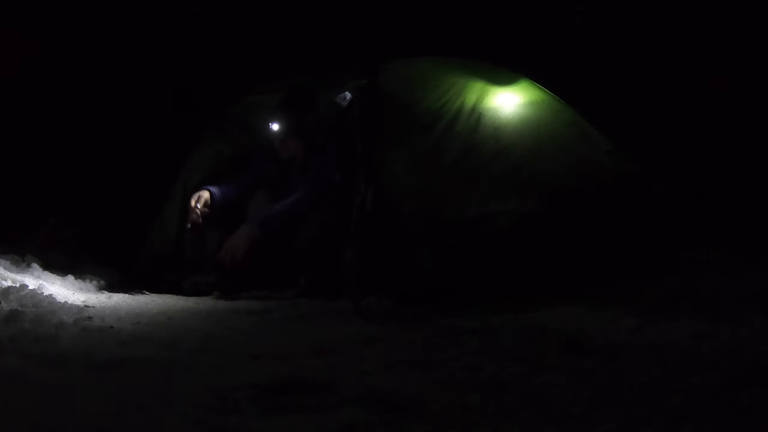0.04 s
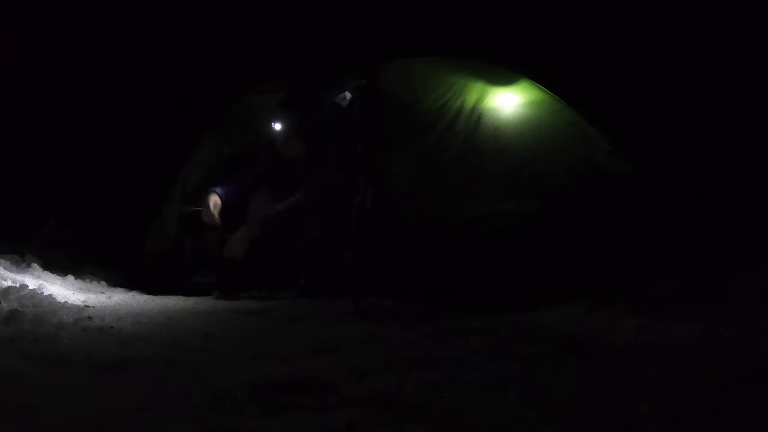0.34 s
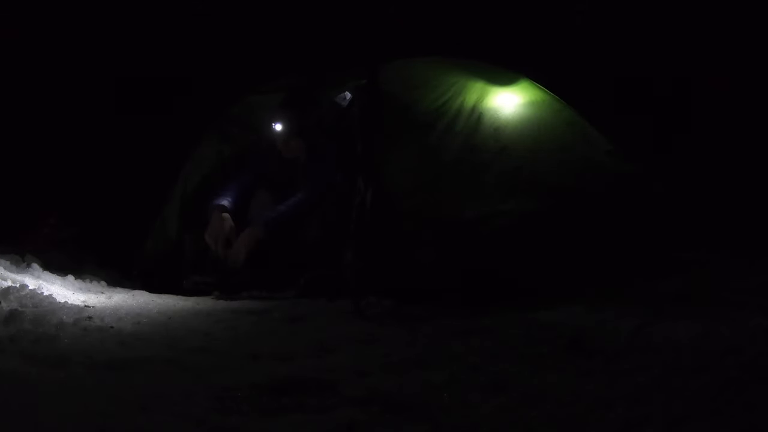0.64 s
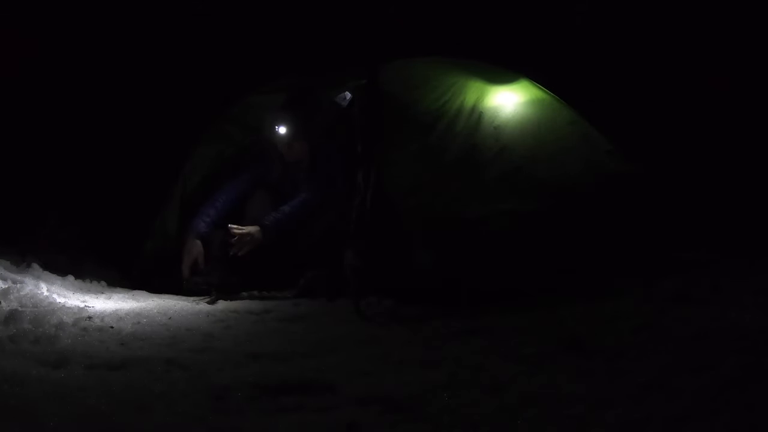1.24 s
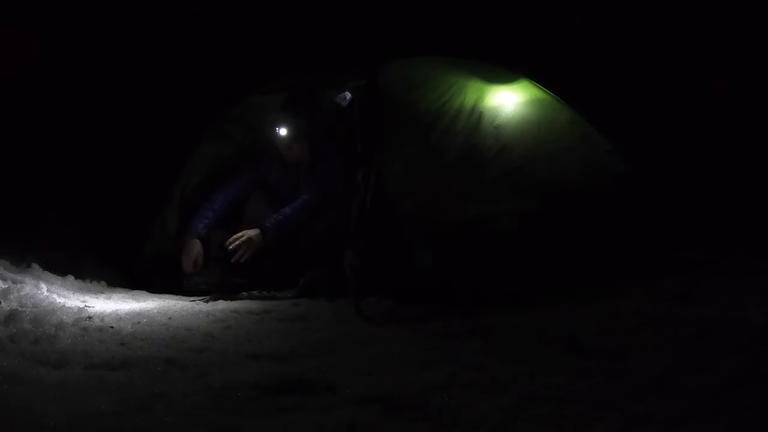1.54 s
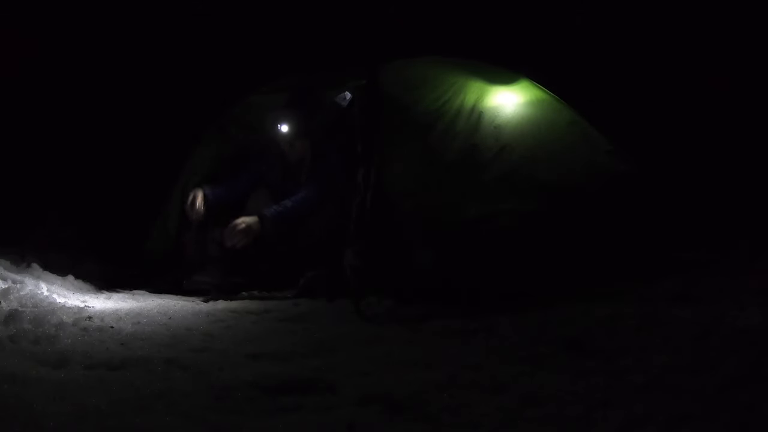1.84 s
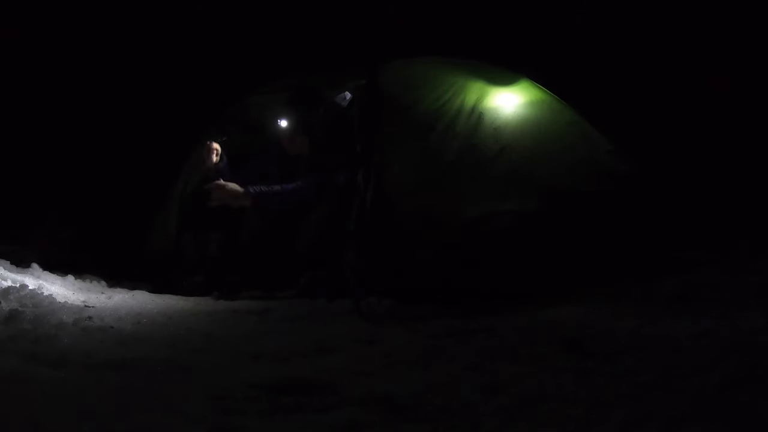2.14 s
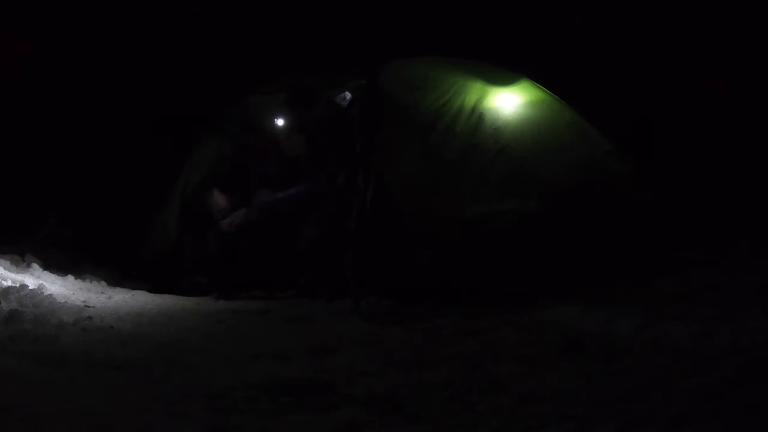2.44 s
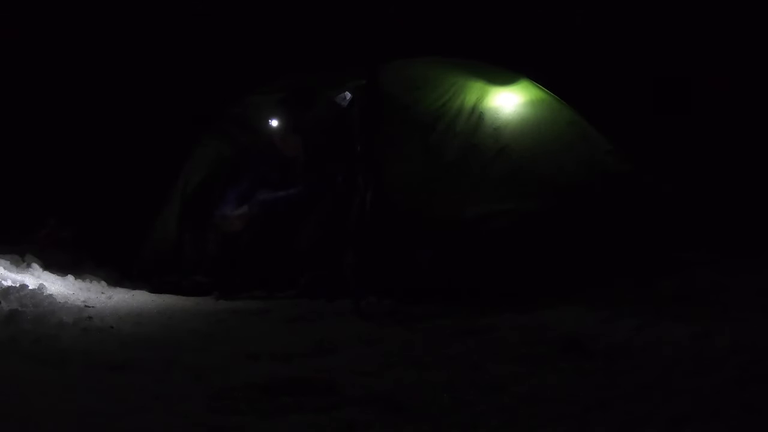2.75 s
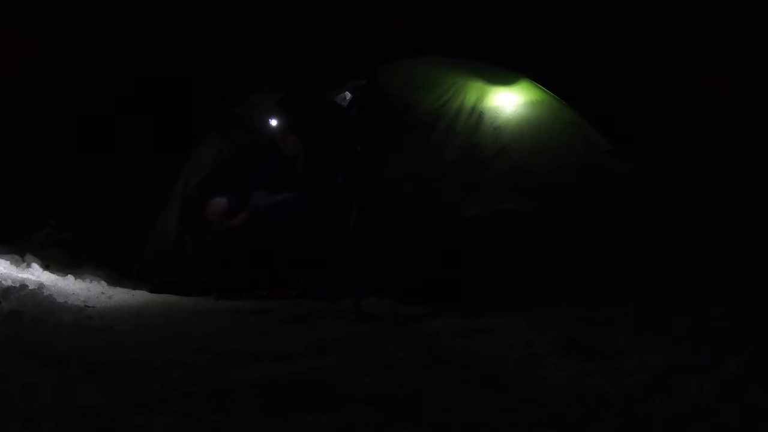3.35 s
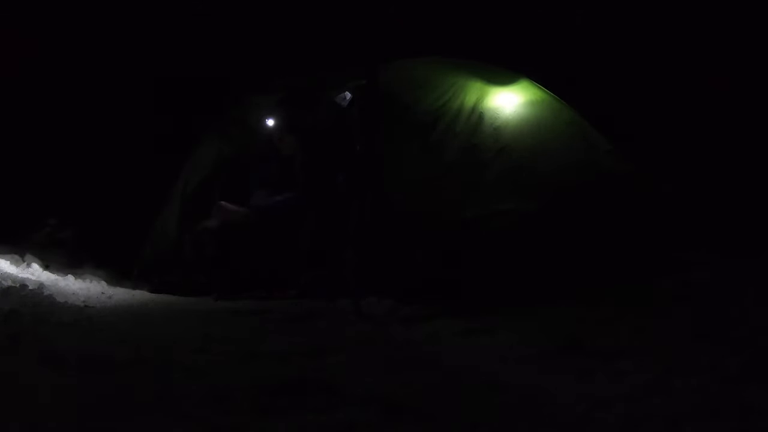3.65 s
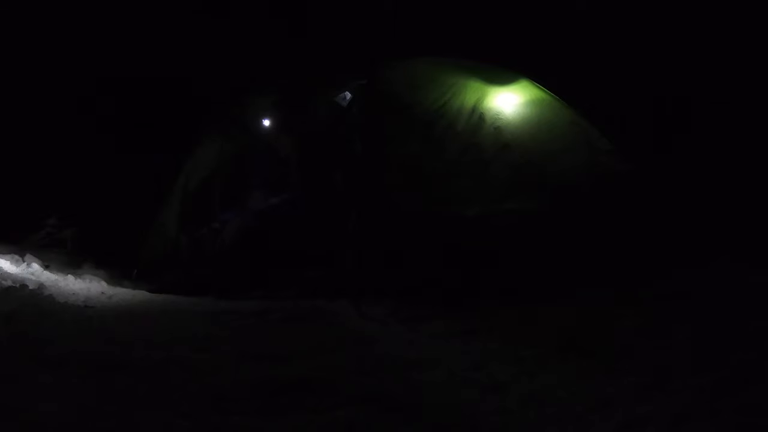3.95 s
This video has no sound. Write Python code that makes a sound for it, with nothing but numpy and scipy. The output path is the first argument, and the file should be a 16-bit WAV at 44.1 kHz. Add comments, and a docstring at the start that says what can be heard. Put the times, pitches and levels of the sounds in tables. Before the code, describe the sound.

Wind buffets the microphone with a low, fluttering drone, strongest in the first 1.3 seconds, while blown snow hisses faintly over a tent. Someone shifts close by, with light nylon ticks and a soft snow crunch near 0.7 seconds. A cluster of dull thumps in the snow comes around 1.4 seconds. The wind then eases; from about 3 seconds nylon swishes, and snow crunches again near 3.5 and 3.9 seconds.

```python
"""A tent on a snowfield at night, heard in stereo from its doorway. From the start, wind buffets the
microphone, whose housing drones near 200 Hz, and drives fine snow hissing over the fabric. Close by,
someone shifts about: nylon ticks and packed snow crunches. Dull thumps come from snow giving way, hardest
around 1.4 s, and twice from wind pushing on the microphone. The wind then eases; from about 3 s the
nylon swishes louder and the snow crunches again."""
import sys
import numpy as np
from scipy import signal
from scipy.io import wavfile

SR = 44100
rng = np.random.default_rng(int(sys.argv[2]) if len(sys.argv) > 2 else 0)


def store_pcm(level_fs):
    """Save levels as 16-bit WAV."""
    pcm = np.round(np.clip(level_fs, -1, 1) * 32767).astype(np.int16)
    wavfile.write(sys.argv[1], SR, np.atleast_2d(pcm).T)


N = 176400

# Wind at the microphone. Each row: time in seconds, level of the drone in dB.
WIND_LEVEL = [(0, -50), (.42, -55.5), (.52, -53), (.9, -53), (1.2, -47), (1.45, -59), (1.82, -60.5),
              (2.1, -57.5), (2.4, -61), (3.05, -63), (3.3, -56), (3.6, -62.5), (3.82, -60), (4, -56.5)]
# Single buffets, then deep puffs. Each row: centre in seconds, level in dB, half length in seconds.
WIND_BUFFETS = [(.012, -32, 0.018), (.064, -32.5, 0.011), (.118, -40, 0.0095), (.16, -41, 0.013),
                (.25, -43.5, 0.044), (.295, -39.5, 0.012), (.335, -37, 0.0058), (.408, -38, 0.0058),
                (.437, -43, 0.028), (.66, -36.5, 0.01), (.745, -47.5, 0.0069), (.83, -44.5, 0.013),
                (.95, -44.5, 0.014), (1.045, -48.5, 0.044), (1.079, -36.5, 0.02), (1.118, -35.5, 0.0052),
                (1.253, -40.5, 0.015), (1.535, -45, 0.012), (1.668, -50, 0.021), (3.497, -43.5, 0.0049),
                (3.71, -55, 0.014), (3.892, -41, 0.0082), (3.98, -53, 0.03)]
WIND_PUFFS = [(.02, -49.5, 0.046), (.188, -45, 0.031), (1.235, -44.5, 0.021), (1.62, -63, 0.12),
              (3.755, -56, 0.013)]
# Close rumble, puffs and far wind. Each row: frequency in Hz, relative level in dB.
RUMBLE_COLOUR = [(122, -19), (142, -13), (170, 17.5), (230, 1.5), (310, -4), (420, -18), (800, -33),
                 (1100, -36)]
DEEP_PUFF_COLOUR = [(30, -21), (70, -8), (110, -3), (155, 9.5), (270, 14.5), (400, -29.5)]
FAR_WIND_COLOUR = [(22, -14), (45, 12), (90, -13.5), (200, 3), (330, 7), (550, 5.5), (760, 6.5),
                   (1040, -17), (1400, 8), (1900, -41.5), (3000, -40)]
# How alike left and right are. Each row: frequency in Hz, coherence (limited to -1..1 in use).
STEREO_LIKENESS = [(30, 0.46), (150, 0.77), (390, 0.35), (620, -1.04), (980, -0.36), (1560, -0.22),
                   (2500, 0.62), (4000, 1), (6300, 0.58), (9000, 0.4), (14000, -0.32)]
# Blown snow, high sizzle and lower hiss. Each row: time in seconds, relative level in dB.
SIZZLE_LEVEL = [(0, -82), (0.17, -82), (0.24, -72), (0.27, -79.5), (0.8, -71), (1.05, -70.5), (1.15, -80),
                (1.21, -74), (1.64, -75), (1.94, -76), (1.97, -69.5), (2.02, -75.5), (2.38, -74.5),
                (2.46, -67), (2.81, -75), (2.95, -72.5), (3.02, -68), (3.21, -68.5), (3.8, -66.5),
                (3.87, -71.5), (4.0, -72.5)]
HISS_LEVEL = [(0, -72.5), (0.24, -74.5), (0.27, -77.5), (1.02, -68.5), (1.16, -72), (1.28, -70.5),
              (1.45, -75), (2.24, -67), (2.38, -76.5), (2.45, -69), (2.71, -72.5), (2.93, -69.5),
              (3.07, -64.5), (3.16, -66), (3.65, -71), (3.7, -68), (4.0, -66.5)]
# Their tone. Each row: frequency in Hz, relative level in dB.
SNOW_SIZZLE_COLOUR = [(4000, -5.5), (6500, -1), (8200, 1), (9500, -1.5), (10500, -10), (14500, -22.5)]
SNOW_HISS_COLOUR = [(1200, -2.5), (2200, -3.5), (3000, -1), (3900, -0.5), (4600, 3.5), (5800, -2.5),
                    (7500, -12), (11000, -12.5)]
# Snow crunching under shifting weight. Each row: time in seconds, level in dB.
CRUNCH_LEVEL = [(0, -60.5), (.69, -93), (.728, -53), (.748, -65), (.768, -53.5), (.805, -58), (.85, -69),
                (1.15, -69), (1.34, -68), (1.385, -57), (1.435, -58), (1.5, -72.5), (2.3, -84), (2.52, -63),
                (2.72, -67), (2.79, -56.5), (3.08, -58), (3.33, -69.5), (3.385, -52), (3.44, -70.5),
                (3.51, -52.5), (3.58, -72), (3.8, -65.5), (3.9, -52), (4, -53)]
# Its tone. Each row: frequency in Hz, relative level in dB.
SNOW_CRUNCH_COLOUR = [(170, 0), (300, 13), (500, 4), (700, -4), (850, -19.5), (1100, -27), (1500, -13)]
# Dull thumps: snow giving way, plus two low pushes of wind on the microphone (0.187 s and 1.23 s).
# Each row: time of the peak in seconds, relative level in dB, pitch there in Hz.
DULL_THUMPS = [(.057, -40, 383), (0.187, -36, 200), (0.733, -42, 390), (1.218, -45, 294), (1.23, -52, 170),
               (1.344, -40.5, 590), (1.353, -46.5, 300), (1.378, -39, 563), (1.387, -35.5, 425),
               (1.392, -42, 432), (1.408, -31, 400), (1.412, -44, 240), (1.423, -40, 485),
               (1.436, -27, 470), (1.439, -30, 257), (1.4508, -34, 482), (1.48, -45, 520),
               (2.331, -38.5, 298), (2.491, -49.5, 520), (2.747, -48, 560), (2.769, -48.5, 500),
               (2.83, -55, 570), (2.965, -44.5, 520), (3.491, -35.5, 357), (3.512, -42, 424),
               (3.866, -46, 470), (3.919, -37.5, 396), (3.931, -42, 480)]
# Creases flipping. Each row: start in seconds, relative level in dB, pitch in Hz.
NYLON_TICKS = [(0.057, -69, 2640), (0.096, -63, 5000), (.107, -66.5, 775), (.2, -63.5, 4500),
               (.239, -67, 8050), (.72, -61, 890), (0.727, -70, 1150), (0.762, -69, 1150),
               (0.791, -74, 1290), (.867, -61, 3200), (0.909, -60, 3270), (.915, -63, 3230),
               (1.012, -63, 3300), (1.029, -60, 3600), (1.116, -66, 1770), (1.217, -60.5, 3430),
               (1.253, -58.5, 3370), (1.271, -59, 3480), (1.291, -56, 3210), (1.5667, -61.5, 4300),
               (1.975, -62, 7000), (2.572, -67, 1510), (2.766, -63, 1390), (2.788, -59, 2010),
               (2.796, -61, 1650), (2.829, -64, 890), (3.073, -57.5, 980), (3.317, -61, 1870),
               (3.488, -59, 5000), (3.507, -59.5, 1290), (3.885, -57.5, 2200)]
# Moving cloth. Each row: centre in seconds, level in dB, half length in seconds,
# share of crumpling from 0 to 1 (the rest is sliding).
NYLON_SWISHES = [(.785, -75, .03, 1), (1.025, -75, .018, .05), (1.3, -70, 0.069, 0.16),
                 (2.2, -75, 0.35, .17), (2.89, -69.5, 0.11, 0.66), (3.0, -64, .035, 0.47),
                 (3.067, -56.5, 0.032, 0.078), (3.109, -57, .017, .03), (3.38, -69.5, 0.034, 0.44),
                 (3.92, -53.5, 0.013, 0.89), (3.96, -67.5, 0.098, 0.83)]
# Sliding and crumpling cloth. Each row: frequency in Hz, relative level in dB.
SLIDING_COLOUR = [(400, 1.5), (800, 6.5), (1200, -11.5), (2000, 1.5), (3200, -1), (5000, -2.5),
                  (7000, -0.5), (10000, -48), (14000, -18)]
CRUMPLING_COLOUR = [(600, 2.5), (900, 5), (1300, 0), (1900, -1.5), (2800, -13.5), (4500, -29)]
# Peaks and dips of the microphone, then of its left port. Each row: centre in Hz, width in Hz, gain in dB.
MICROPHONE_PEAKS = [(570, 170, -0.5), (778, 134, 7)]
LEFT_PORT_PEAKS = [(5270, 520, 2.5), (9030, 680, 9), (11100, 1400, -17)]

DRONE_HZ, DRONE_WIDTH_HZ, BUFFET_WIDTH_HZ = 202.5, 37, 20.3
RUMBLE_DB, CALM_DB, RUMBLE_FOLLOWS = -60, -60.5, 0.72   # rumble in a calm, drone in a calm, dB per dB
FAR_WIND_DB, SIZZLE_TRIM_DB, HISS_TRIM_DB = -73, -0.5, 0.5
THUMP_RISE_S, THUMP_END_HZ, THUMP_SAG = 0.00362, 178, 0.92   # sag: rate of pitch fall per rise time
THUMP_TRIM_DB, THUMP_RING_DB = -5, 11
TICK_DECAY_S, TICK_WIDTH_SHARE, TICK_LOW_HZ, TICK_HIGH_HZ = 0.004, 0.36, 650, 9000
FADE_IN_S, CUTOFF_HZ = .004, 15000


def from_db(db):
    """Decibels to gain."""
    return 10 ** (np.asarray(db) / 20)


def rms_one(x):
    """Scale to unit rms."""
    return x / np.sqrt(np.mean(x ** 2) + 1e-20)


def in_time(rows):
    """Join (seconds, value) rows by straight lines."""
    return np.interp(np.arange(N) / SR, *np.transpose(rows))


def at_hz(rows, hz):
    """Read (Hz, value) rows on a log axis."""
    frequencies, values = np.transpose(rows)
    return np.interp(np.log(hz), np.log(frequencies), values)


def pan(db):
    """Left and right gains, the left louder by db."""
    return from_db(np.array([[.5], [-.5]]) * db)


def swells(rows):
    """Summed power of bell-shaped swells."""
    t = np.arange(0, N, 20) / SR
    power = sum(from_db(db) ** 2 * np.exp(-np.minimum(((t - centre) / half) ** 2, 100))
                for centre, db, half in rows)
    return np.interp(np.arange(N) / SR, t, power)


def drift(rate_hz):
    """Slow random wander, rms 1, worked out every 40 samples."""
    pole = np.exp(-80 * np.pi * rate_hz / SR)
    slow = signal.lfilter([1], [1, -2 * pole, pole * pole], rng.standard_normal(N // 40 + 2002))[2000:]
    return np.interp(np.arange(N) / 40, np.arange(len(slow)), rms_one(slow))


def resonate(x, hz, width_hz):
    """One resonance, gain 1 at its peak."""
    r = np.exp(-np.pi * width_hz / SR)
    feedback = [1, -2 * r * np.cos(2 * np.pi * hz / SR), r * r]
    return signal.lfilter(np.array([1, 0, -1]) * (1 - r * r) / 2, feedback, x)


def muffle(x, hz):
    """A steep low-pass."""
    return signal.sosfilt(signal.butter(6, hz, fs=SR, output="sos"), x)


def peaked(x, peaks):
    """Lift or dip the sound around each listed frequency."""
    for hz, width_hz, gain_db in peaks:
        x = x + (from_db(gain_db) - 1) * resonate(x, hz, width_hz)
    return x


def white():
    """Four strands of white noise."""
    return rng.standard_normal((2, 2, N))


def grains(per_s, spread_db):
    """Four strands of random clicks of uneven size, rms 1."""
    shape = (2, 2, N)
    sizes = from_db(spread_db * np.minimum(rng.exponential(1, shape), 4))
    signs = rng.choice([-1, 1], shape)
    return rms_one(sizes * signs * (rng.random(shape) < per_s / SR)) + 1e-18


def coloured(strands, colour, flicker_db, flicker_hz, bands, likeness=STEREO_LIKENESS):
    """Mix four strands into stereo bands, each with its level, flicker and likeness; rms 1."""
    edges = np.geomspace(colour[0][0], colour[-1][0], bands + 1)
    out, shared_drift = 0, drift(flicker_hz)
    for k, (low, high) in enumerate(zip(edges, edges[1:])):
        bandpass = signal.butter(2, [low, high], "band", fs=SR, output="sos")
        mid, side = signal.sosfilt(bandpass, strands[k % 2])
        hz = np.sqrt(low * high)
        alike = np.clip(at_hz(likeness, hz), -1, 1)
        gain = from_db(at_hz(colour, hz) + flicker_db * (1.5 * shared_drift + drift(flicker_hz)))
        out = out + gain * (np.sqrt(1 + alike) * mid + np.sqrt(1 - alike) * side * [[1], [-1]])
    return rms_one(out)


def housing_drone(width_hz, evenness):
    """Turbulence through the microphone housing's resonance, its beating partly evened out; rms 1."""
    turbulence = rng.standard_normal(N + SR)
    ringing = resonate(resonate(turbulence, DRONE_HZ, width_hz), DRONE_HZ, width_hz)
    analytic = signal.hilbert(ringing)[SR:]   # its magnitude is the envelope
    analytic = analytic / np.std(analytic)
    return rms_one(analytic.real / (abs(analytic) ** 2 + 0.14) ** (evenness / 2))


def wind():
    """Wind right on the microphone drones, buffets, rumbles and puffs, with the far wind behind it."""
    force = from_db(in_time(WIND_LEVEL))
    drone = force * housing_drone(DRONE_WIDTH_HZ, evenness=0.17)
    buffets = np.sqrt(swells(WIND_BUFFETS)) * housing_drone(BUFFET_WIDTH_HZ, evenness=0.51)
    rumble = coloured(white(), RUMBLE_COLOUR, flicker_db=1.5, flicker_hz=20, bands=11)
    rumble *= from_db(RUMBLE_DB) * (force / from_db(CALM_DB)) ** RUMBLE_FOLLOWS
    puffs = coloured(white(), DEEP_PUFF_COLOUR,
                     flicker_db=-0.5, flicker_hz=78, bands=6, likeness=[(150, 0.96)])
    puffs = np.sqrt(swells(WIND_PUFFS)) * muffle(puffs, hz=390)
    far_wind = coloured(white(), FAR_WIND_COLOUR, flicker_db=1.33, flicker_hz=7.5, bands=13)
    return drone + buffets + rumble + puffs + from_db(FAR_WIND_DB) * far_wind


def blown_snow():
    """Countless crystals skitter over the tent: a high sizzle, and a lower hiss slightly to the left."""
    sizzle = coloured(grains(per_s=16000, spread_db=4), SNOW_SIZZLE_COLOUR,
                      flicker_db=0.57, flicker_hz=37, bands=13)
    hiss = coloured(grains(per_s=12000, spread_db=4), SNOW_HISS_COLOUR,
                    flicker_db=-0.3, flicker_hz=13.5, bands=14)
    sizzle *= from_db(in_time(SIZZLE_LEVEL) + SIZZLE_TRIM_DB)
    hiss *= from_db(in_time(HISS_LEVEL) + HISS_TRIM_DB)
    return sizzle + pan(db=1.5) * hiss


def snow_crunch():
    """Packed snow in the doorway breaks in small muffled fractures under a shifting weight."""
    fractures = coloured(grains(per_s=1400, spread_db=4), SNOW_CRUNCH_COLOUR,
                         flicker_db=2.0, flicker_hz=20, bands=9, likeness=[(500, 0.84)])
    return from_db(in_time(CRUNCH_LEVEL)) * fractures


def dull_thumps():
    """Each thump, of snow or wind, is a short rounded push that sags in pitch and rings the housing."""
    age = np.arange(SR // 10) / SR / THUMP_RISE_S   # in rise times
    envelope = (age * np.exp(1 - age)) ** 3
    pushes = np.zeros(N + SR)
    for peak_s, db, hz in DULL_THUMPS:
        pitch = THUMP_END_HZ + (hz - THUMP_END_HZ) * np.exp(THUMP_SAG * (1 - age))
        phase = 2 * np.pi * np.cumsum(pitch) / SR
        start = int((peak_s - THUMP_RISE_S) * SR)
        pushes[start:start + len(age)] += from_db(db) * envelope * np.sin(phase)
    thumps = muffle(pushes[:N] + 1e-18, hz=633)
    ringing = from_db(THUMP_RING_DB) * resonate(thumps, DRONE_HZ, DRONE_WIDTH_HZ)
    return from_db(THUMP_TRIM_DB) * (thumps + ringing)


def nylon_ticks():
    """Left of centre, each crease flips with a short burst around its own pitch."""
    t = np.arange(SR // 10) / SR
    ticks = np.zeros(N + SR)
    for start_s, db, hz in NYLON_TICKS:
        burst = rng.standard_normal(len(t)) * np.exp(-t / TICK_DECAY_S)
        width_hz = TICK_WIDTH_SHARE * hz
        gain = from_db(db) * np.sqrt(SR / np.pi / width_hz)   # makes up for the narrow band
        start = int(start_s * SR)
        ticks[start:start + len(t)] += gain * resonate(burst, hz, width_hz)
    bandpass = signal.butter(2, [TICK_LOW_HZ, TICK_HIGH_HZ], "band", fs=SR, output="sos")
    return pan(db=4) * signal.sosfilt(bandpass, ticks[:N] + 1e-18)


def nylon_swishes():
    """Close by and left of centre, cloth slides and crumples in grainy swishes."""
    slide_power = sum((1 - share) * swells([swell]) for *swell, share in NYLON_SWISHES)
    crumple_power = sum(share * swells([swell]) for *swell, share in NYLON_SWISHES)
    slide = coloured(grains(per_s=3400, spread_db=4), SLIDING_COLOUR,
                     flicker_db=1.9, flicker_hz=17, bands=9)
    crumple = coloured(grains(per_s=1100, spread_db=4.5), CRUMPLING_COLOUR,
                       flicker_db=2.3, flicker_hz=55, bands=5)
    return pan(db=4.5) * (np.sqrt(slide_power) * slide + np.sqrt(crumple_power) * crumple)


def scene():
    """The weather around the tent and the person in its doorway."""
    return wind() + blown_snow() + nylon_swishes() + nylon_ticks() + snow_crunch() + dull_thumps()


def record(dry):
    """The sound eases in; the microphone colours the middle, its left port the treble; the top is cut."""
    fade_in = np.sin(np.pi / 2 * np.minimum(np.arange(N) / (FADE_IN_S * SR), 1)) ** 2
    left, right = peaked(dry * fade_in, MICROPHONE_PEAKS)
    left = peaked(left, LEFT_PORT_PEAKS)
    steep_lowpass = signal.ellip(10, .1, 80, CUTOFF_HZ, fs=SR, output="sos")
    return signal.sosfilt(steep_lowpass, np.array([left, right]))


dry = scene()
out = record(dry)
store_pcm(out)
```